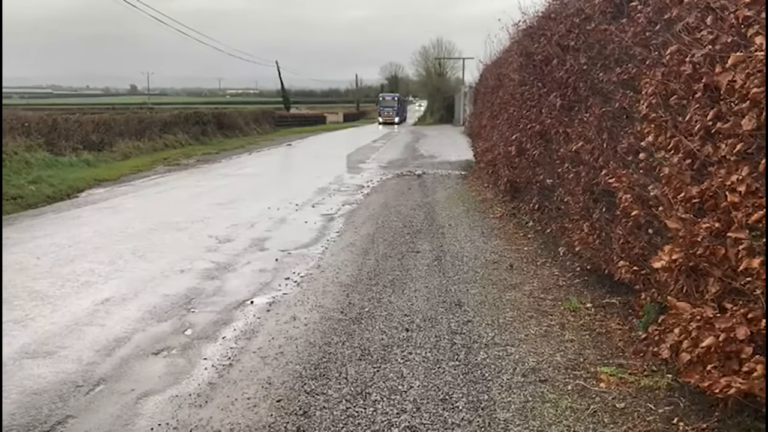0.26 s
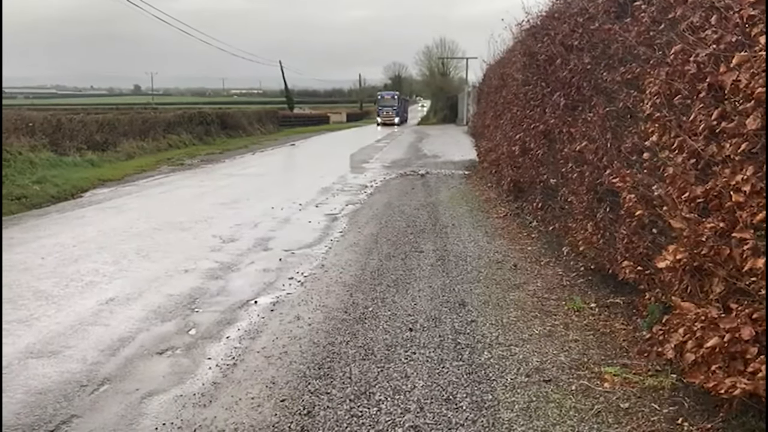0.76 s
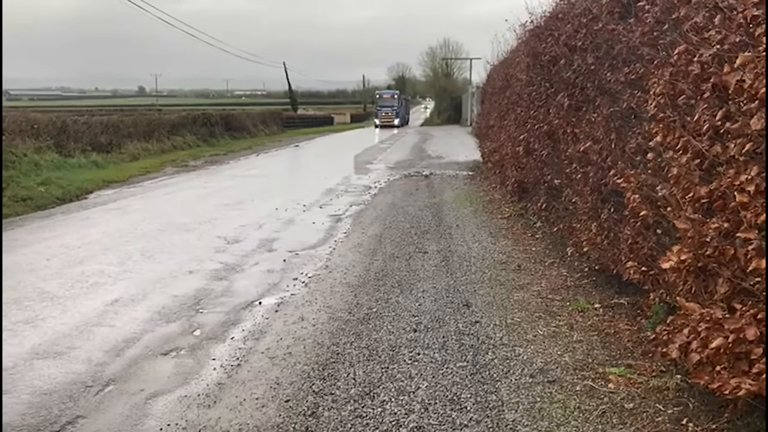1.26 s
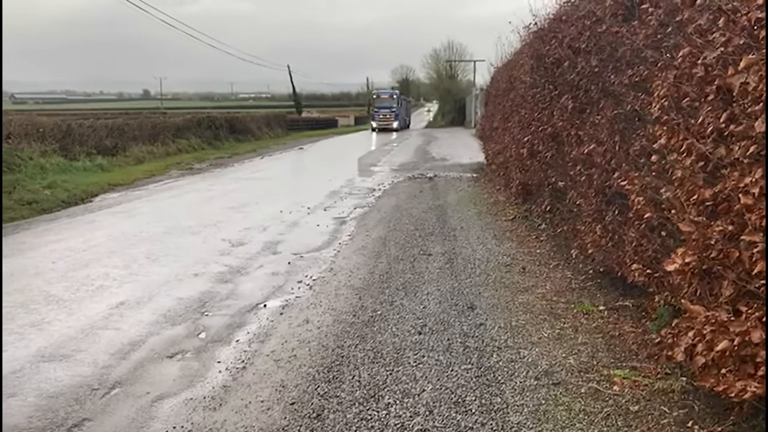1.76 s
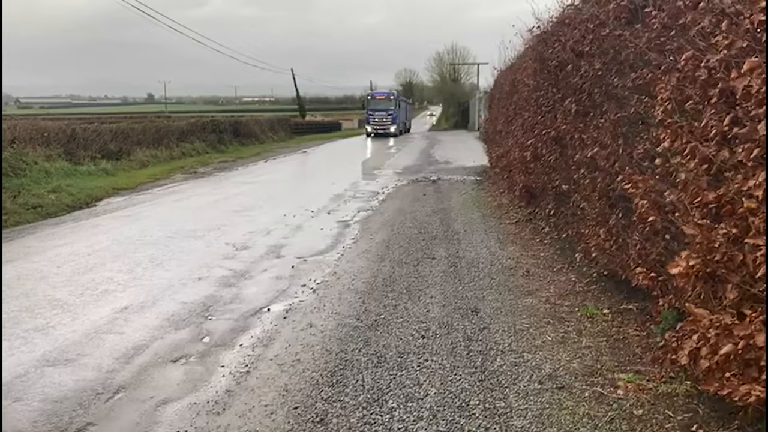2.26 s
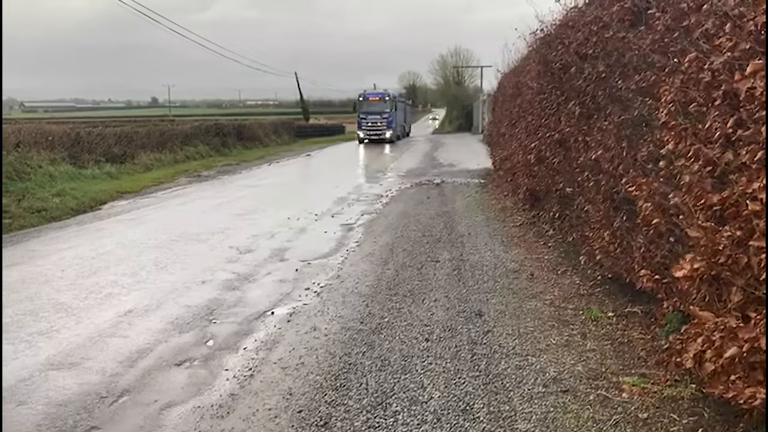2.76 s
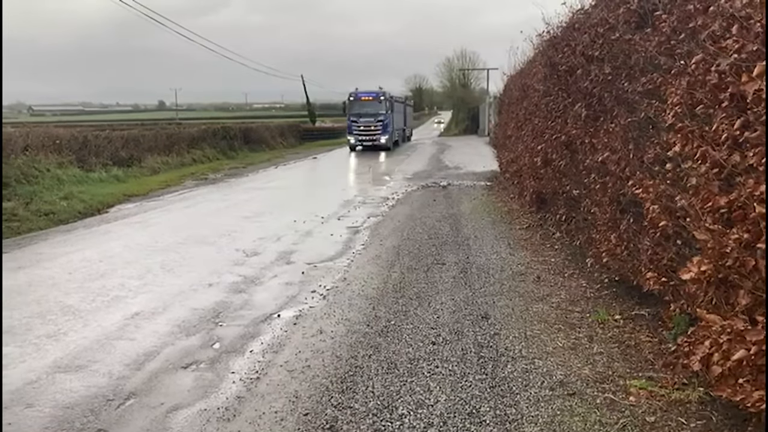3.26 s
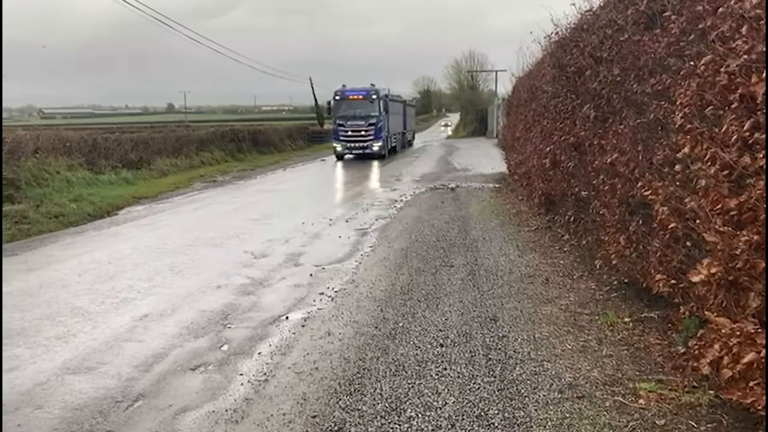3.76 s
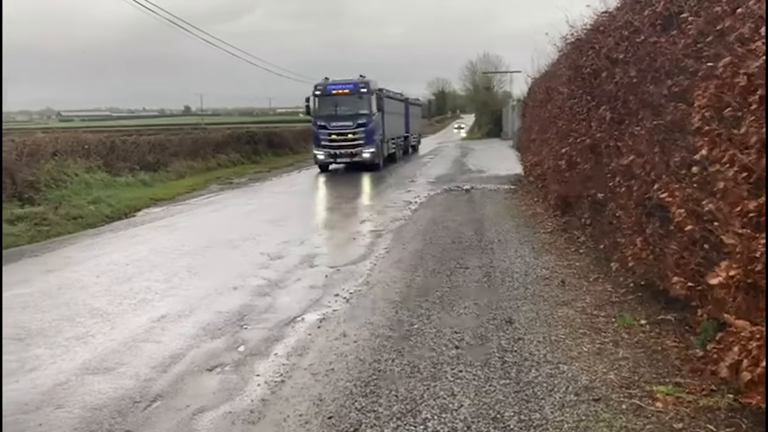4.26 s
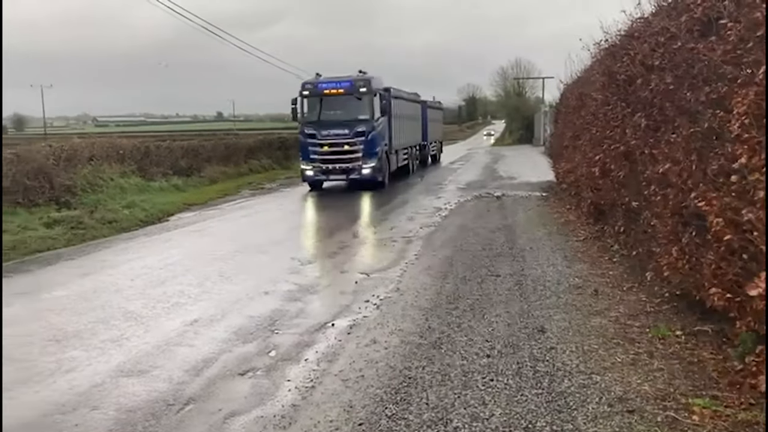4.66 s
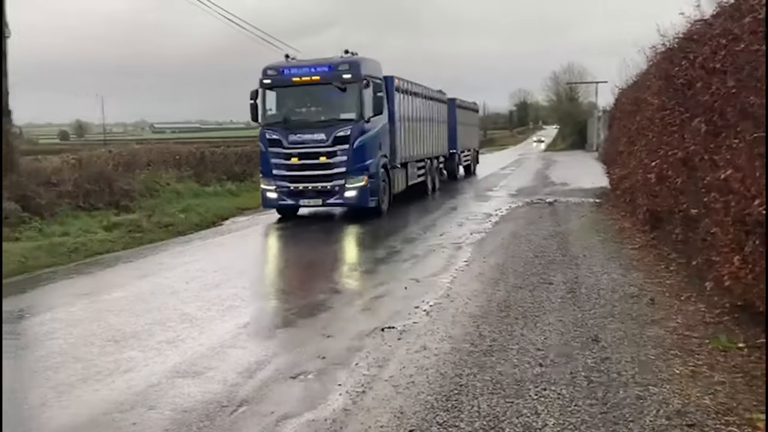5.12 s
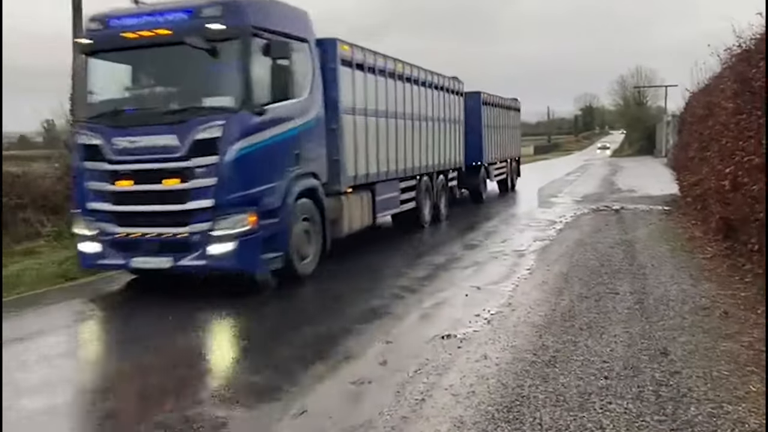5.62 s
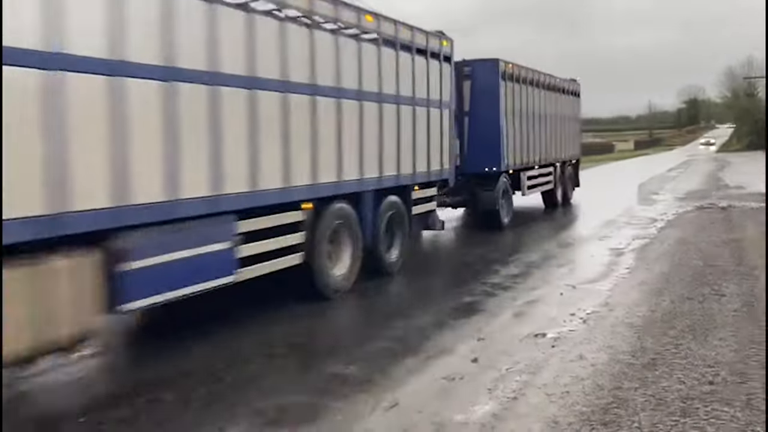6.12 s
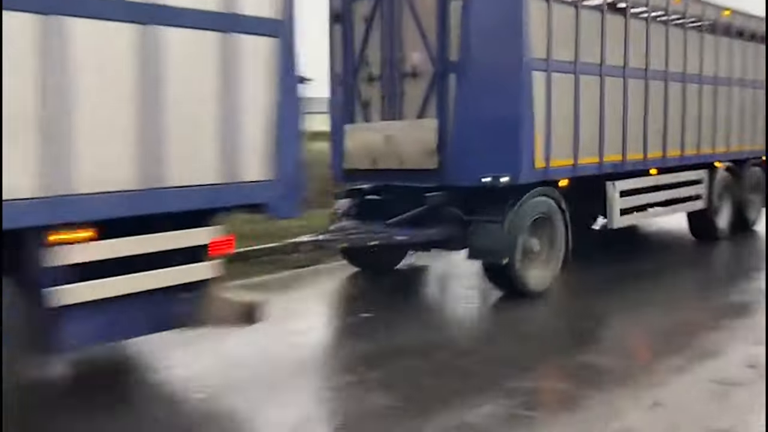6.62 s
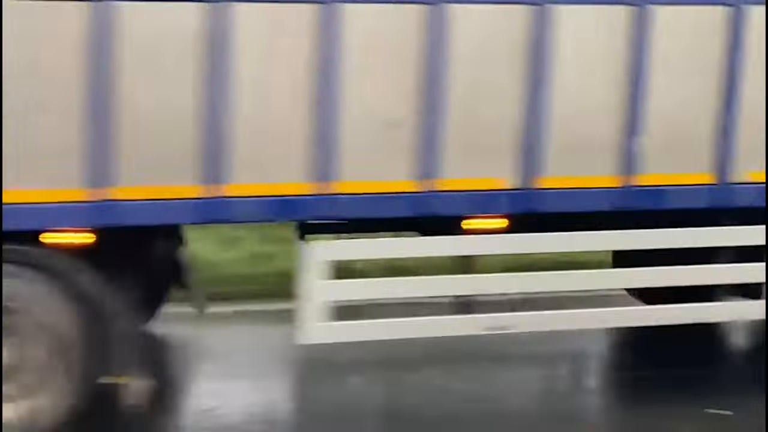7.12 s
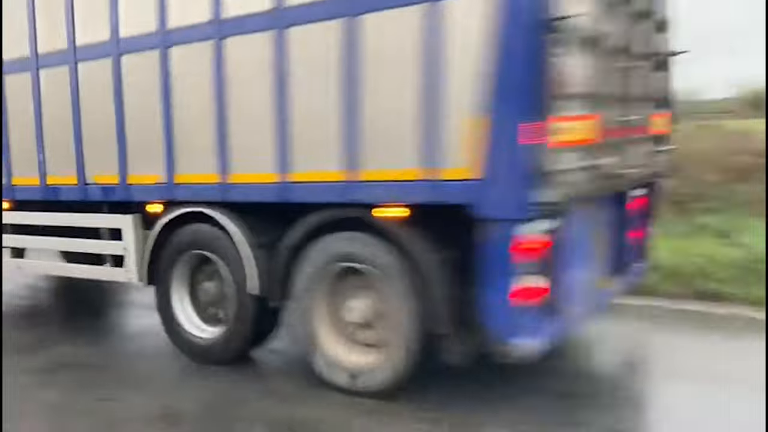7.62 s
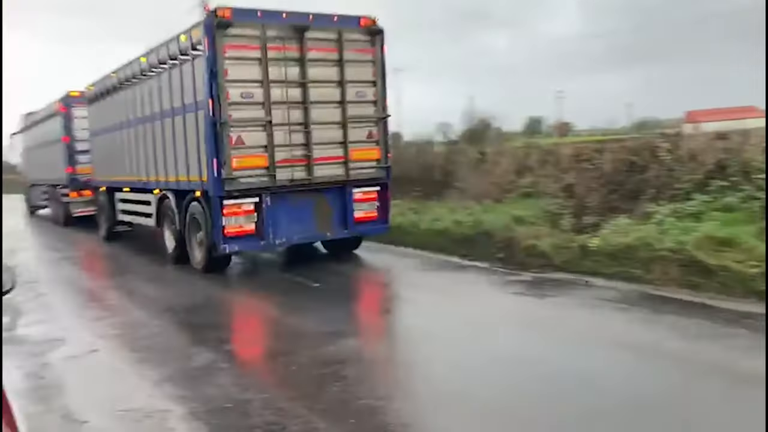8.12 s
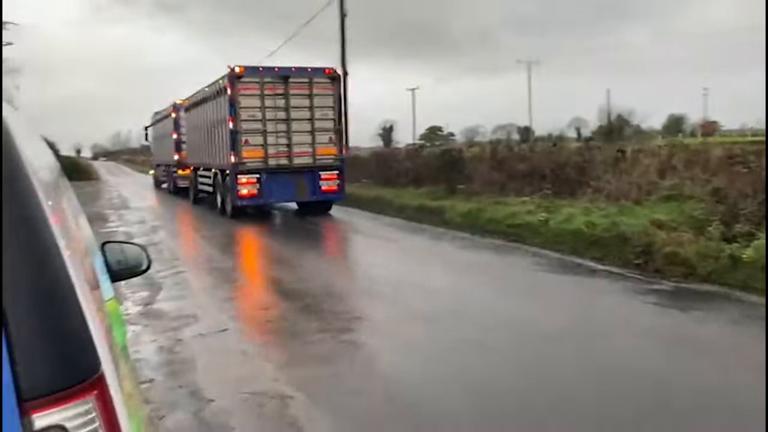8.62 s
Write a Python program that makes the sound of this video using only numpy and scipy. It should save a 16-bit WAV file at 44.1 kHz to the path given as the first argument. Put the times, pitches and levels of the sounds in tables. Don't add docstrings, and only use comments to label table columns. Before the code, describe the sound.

A heavy diesel lorry with trailer approaches on a wet road, toots its horn, roars past close with spray and slams, then eases off and recedes.

```python
import sys
import numpy as np
from scipy import signal
from scipy.fft import rfft, irfft, next_fast_len
from scipy.io import wavfile
from scipy.ndimage import uniform_filter1d, map_coordinates

SR = 44100
rng = np.random.default_rng(int(sys.argv[2]) if len(sys.argv) > 2 else 0)


def rack_gain(trim_db):
    fader = np.asarray(trim_db, float)
    return 10 ** (fader / 20)


def unload_audio(sound):
    columns = np.transpose(np.atleast_2d(sound))
    steps = np.round(np.clip(columns, -1, 1) * 32767)
    wavfile.write(sys.argv[1], SR, steps.astype(np.int16))


N = 391608
T = np.arange(N) / SR
SHIELD_S = 6.723


def unit(x):
    return x / np.sqrt(np.mean(x ** 2) + 1e-20)


def along(points, hz):
    f, v = np.transpose(points)
    return np.interp(np.log(hz + 1), np.log(f + 1), v)


def curves(rows):
    s, *cols = np.transpose(rows)
    return [np.interp(T, s, c) for c in cols]


def wobble(rate):
    return map_coordinates(rng.standard_normal(int(N * rate / SR) + 4), [T * rate])


def bump_at(s, half_s):
    return np.exp(-((T - s) / half_s) ** 2)


def filtered(x, response):
    m = next_fast_len(N + 8192)
    return irfft(rfft(x, m) * response(np.fft.rfftfreq(m, 1 / SR)), m)[..., :N]


def coloured(x, spectrum):
    return unit(filtered(x, lambda hz: rack_gain(along(spectrum, hz))))


def smooth_field(shape, bins, frames):
    field = uniform_filter1d(rng.standard_normal(shape), size=bins, axis=0)
    return unit(uniform_filter1d(field, size=frames, axis=1))


def patchy(patchy_db):
    z = signal.stft(rng.standard_normal((2, N)), nperseg=512)[2]
    gain = rack_gain(patchy_db * smooth_field(z.shape[1:], 6, 12))
    return signal.istft(z * gain, nperseg=512)[1][:, :N]


# (t/s, level/dB)
BUFFET = [(0, -41), (1.5, -34.5), (3.2, -17.5), (3.9, -19.5), (4.6, -47), (6.2, -59), (6.8, -36),
          (7.2, -41), (8.88, -23)]


def buffet():
    lumps = rack_gain(2.5 * np.array([wobble(9), wobble(9)]))
    spectrum = [(15, -28), (35, -6), (70, 0), (120, -3), (220, -8.5), (400, -64)]  # (f/Hz, level/dB)
    return rack_gain(curves(BUFFET)[0]) * unit(lumps * coloured(patchy(0.3), spectrum))


# (t/s, level/dB, f/Hz)
SQUEAK = [
    (6.12, -21, 7500),
    (6.205, -17, 7500),
    (6.285, -30, 7430),
]


def squeaks():
    return sum(rack_gain(db + 3 * wobble(148)) * bump_at(s + .02, 0.015)
               * np.sin(2 * np.pi * hz * T + 0.76 * wobble(500)) for s, db, hz in SQUEAK)


# (f/Hz, width/Hz, level/dB)
CAB = [(274, 66, -4.5), (360, 54, -4.5), (477, 27, 1), (596.4, 33, 2), (696, 54, -3.5), (837, 80, -7)]


def cab(f):
    return sum((-1) ** k * rack_gain(db) * 1j * f * w / (c * c - f * f + 1j * f * w)
               for k, (c, w, db) in enumerate(CAB))


# (t/s, peak level/dB, crack relative level/dB, t60/s)
BUMPS = [
    (0.695, -19, -7, .02),
    (0.778, -8, -27, 0.055),
    (.865, -11, -30, 0.043),
    (0.952, -24, -5, 0.023),
    (1.036, -23, -4, .025),
    (1.121, -29, -8, .02),
    (2.219, -29.5, -28, 0.043),
    (3.7, 3, -27, 0.023),
    (6.686, 1, 0, 0.081),
    (6.782, 9.5, -9, 0.051),
]


def bumps():
    x = rng.standard_normal(N)
    thud, crack, push = np.zeros((3, N))
    for s, db, crack_db, t60 in BUMPS:
        burst = rack_gain(-60 * np.maximum(T - s, 0) / t60) * (T > s)
        thud += rack_gain(db + 6.5) * burst
        crack += rack_gain(db + crack_db - 4) * burst
        push += 1.4 * burst ** (t60 / .003)
    bright = [(700, -41), (1000, 2), (2000, -1), (4200, -6), (6000, -35), (9000, -120)]  # (f/Hz, level/dB)
    return filtered(thud * (x + push), cab) + crack * coloured(x, bright)


# (full from t/s, hold/s, release t60/s, f/Hz, level/dB)
HORNS = [
    (5.166, 0.028, 0.0095, 423, -16),
    (5.188, 0.02, 0.32, 265.7, -4.5),
]
# (f/Hz, level/dB)
BRIGHT_BELL = [(400, -18), (850, -3.5), (1270, -1), (2100, -7), (2550, -18), (3400, -13), (5000, -21.5),
               (7600, -13), (8500, -22), (11500, -19)]
DEEP_BELL = [(260, -21), (530, 0.5), (800, -16), (1060, -5.5), (1330, -17), (1600, -18), (1870, -22),
             (2900, -22.5), (3700, -31), (6000, -48)]


def horn(s, hold, t60, hz, db, bell):
    rise_db = -2200 * np.clip(s - T, 0, .1)
    release_db = -60 * np.clip(T - s - hold, 0, 2 * t60) / t60
    flutter = .16 * wobble(90)
    tone = np.zeros(N)
    for k in range(1, int(bell[-1][0] / hz) + 1):
        unrest_db = 2.0 * (k > 2.5) * wobble(60)
        dulling_db = 1.0 * k * np.clip(T - s - .03, 0, .1) / t60
        phase = 2 * np.pi * k * hz * T + 0.18 * k * k + k * flutter + 0.058 * wobble(83)
        tone += rack_gain(along(bell, k * hz) + unrest_db - dulling_db) * np.sin(phase)
    return rack_gain(db + rise_db + release_db) * np.sqrt(2) * tone


# (t/s, aspect: 0 ahead, 1 beside, 2 behind)
TURN = [
    (0, 0.22),
    (5.55, -0.15),
    (5.95, 0.84),
    (6.15, 0.95),
    (6.9, 1.12),
    (7.4, 1.95),
    (8.88, 1.95),
]


def aspects():
    return [np.sqrt(np.clip(1 - abs(curves(TURN)[0] - k), 0, 1)) for k in range(3)]


# (t/s, camshaft turns a second as heard)
REVS = [(0, 12.444), (2, 12.618), (3.6, 12.901), (5.2, 13.376), (6.3, 13.489), (6.6, 12.835), (7.3, 12.6),
        (7.75, 11.2), (8.1, 8.6), (8.88, 8.0)]


def cam():
    return -.33 + np.cumsum(curves(REVS)[0]) / SR


def since(turns):
    return turns % 1 / np.gradient(turns * SR)


# (t/s, level/dB)
CHUFFS = [(2.27, 2.5), (2.35, 2.5), (2.43, 3), (2.51, 3), (2.58, 3.5), (2.66, 3), (2.74, 1), (2.82, 1.5),
          (2.9, -1.5), (2.98, 1), (3.05, 0), (3.13, 1), (3.21, -0.5), (3.29, 1.5), (3.37, 2.5), (3.44, 0),
          (3.52, 1.5), (3.6, 2.5), (3.68, 1), (3.75, 2.5), (3.83, 1), (3.91, 0.5), (3.98, 0), (4.06, -4.5),
          (4.14, 1.5), (4.21, -1), (4.29, -1.5), (4.37, -0.5), (4.44, -1.5), (4.52, -2.5), (4.6, -2.0),
          (4.67, -5), (4.75, 0.5), (4.82, -2), (4.9, 2.5), (4.97, -2), (5.05, 0), (5.12, 1.5), (5.2, -11),
          (5.27, -3), (5.35, -3), (5.42, 2), (5.5, 0.5), (5.57, -2.5), (5.65, -0.5), (5.72, 1.5),
          (5.79, -1.5), (5.87, 1.5), (5.94, -3.5), (6.02, 2), (6.09, 3), (6.17, 2.5), (6.24, 1),
          (6.31, -0.5), (6.39, -4), (6.46, 0), (6.54, 1), (6.62, -7.5), (6.7, -0.5), (6.77, 4)]
BLOW = rack_gain(.7 * rng.standard_normal((200, 2)))


def sizes(turns):
    s, db = np.transpose(CHUFFS)
    listed = np.zeros(len(BLOW))
    listed[cam()[(s * SR).astype(int)].astype(int) + 1] = db
    pairs = BLOW * rack_gain(listed[:, None] * [1.3, .3])
    return pairs[np.clip(turns + 1, 0, 199).astype(int)]


def chuff(turns, t60, second, second_db, hold_s=0):
    gate = np.zeros(N)
    for which, (lag, db) in enumerate(((0, 0), (second, second_db))):
        size = rack_gain(db) * sizes(turns - lag)[:, which]
        age = since(turns - lag)
        decay = rack_gain(-60 * np.maximum(age - hold_s / (1 + 2 * which), 0) / t60)
        gate += size * decay * (1 - np.exp(-age / 0.00081))
    return unit(gate)


def driven(turns, share, patchy_db, t60, second, second_db, hold_s=0):
    share = np.clip(share, 0, 1)
    bursts = chuff(turns, t60, second, second_db, hold_s) * rng.standard_normal((2, N))
    return np.sqrt(1 - share) * patchy(patchy_db) + np.sqrt(share) * bursts


# (f/Hz, level/dB per Hz)
SPRAY = [(2500, -17), (3400, 0), (4200, 0), (5200, -0.5), (6800, -2), (8200, 1.5), (9200, 1), (10200, -2.5),
         (11300, -2.5), (11800, -9.5), (12300, -120)]


def spray(turns, load):
    x = driven(turns, 0.18 * load, patchy_db=2.0, t60=0.14, second=0.11, second_db=8)
    fizz = rack_gain(0.15 * wobble(300) + 1.1 * wobble(3.6))
    near = coloured(x * fizz, SPRAY)
    far = np.clip(1 - T / 4.35, 0, 1)
    dulled = filtered(near, lambda hz: rack_gain(-14 * (hz / 10000) ** 2))
    return far * 1.8 * dulled + (1 - far) * near


# (f/Hz, level/dB per Hz)
RASP_AHEAD = [(800, -70), (950, -2), (1300, 0), (1700, -5.5), (2100, -9), (2700, -12.5), (3400, -16.5),
              (4100, -21), (5200, -35), (8000, -120)]
RASP_BEHIND = [(800, -60), (950, -19), (1300, -9.5), (1900, -13.5), (2600, -13.5), (3000, -11.5),
               (3600, -23), (4300, -25), (5200, -7.5), (8000, -120)]


def rasp(turns, load):
    _, beside, behind = aspects()
    share = 1.15 * load ** 2 * (1 - 0.3 * beside)
    x = driven(turns, share, patchy_db=1.0, t60=0.12, second=0.465, second_db=-21.5, hold_s=0.0044)
    return np.sqrt(1 - behind ** 2) * coloured(x, RASP_AHEAD) + behind * coloured(x, RASP_BEHIND)


def bark(turns):
    start_hz, falls_hz_s, peak_s = 676.7, 5920, 0.014
    age = since(turns)
    size = sizes(turns)[:, 0] * age / peak_s * np.exp(-age / peak_s)
    mean_hz = start_hz - falls_hz_s * np.minimum(age, .04) / 2
    return unit(size * np.sin(2 * np.pi * mean_hz * age + 0.5 * wobble(40)))


# (f/Hz, level/dB, t60/s)
CLANG = [(476.6, 1, 0.14), (603.3, -0.5, 0.14), (698, -4, 0.034), (1317, -4.5, 0.046), (2020, -9.5, 0.094)]


def clang(turns):
    x = np.zeros(N)
    for which, (lag, strike_db) in enumerate(((0, 0), (.5, -3))):
        age = since(turns - lag)
        ring = sum((-1) ** k * rack_gain(db + 2.1 * wobble(4.9) - 60 * age / t60)
                   * np.sin(2 * np.pi * hz * age + 0.3 * wobble(25)) for k, (hz, db, t60) in enumerate(CLANG))
        x += rack_gain(strike_db) * sizes(turns - lag)[:, which] * ring * (1 - np.exp(-age / 0.0015))
    return unit(x)


# (f/Hz, level/dB per Hz)
ROAR_BESIDE = [(150, -57), (260, -3.5), (317, -4.5), (420, -4), (553, -2.5), (830, -2), (1100, -17),
               (1430, -57), (2420, -120)]
ROAR_BEHIND = [(140, -39), (230, -13), (317, -9), (476, -14.5), (501, -6), (546, -9), (686, 0),
               (1100, -10.5), (1430, -10), (2420, -120)]


def roar(turns, load):
    ahead, beside, behind = aspects()
    knock = unit(chuff(turns, t60=0.0045, second=0.5, second_db=-6.5)
                 - chuff(turns - .03, t60=0.0038, second=0.55, second_db=10.0))
    share = (0.69 + 0.19 * beside) * load
    x = driven(turns, share, patchy_db=1.0, t60=0.048, second=0.497, second_db=-2, hold_s=0.027)
    x = x + 0.22 * load * knock
    boom_hz, width_hz = 356, 4.2
    boom = filtered(x, lambda f: 1j * f * width_hz / (boom_hz ** 2 - f * f + 1j * f * width_hz))
    boom = rack_gain(7.5) * np.clip(1 - T / 2.9, 0, 1) * boom
    metal = load * (rack_gain(-6) * bark(turns) + rack_gain(-5) * clang(turns))
    nose = unit(filtered(x, lambda f: cab(f) * abs(cab(f)) ** 0.27) - boom) + metal * [[1], [0]]
    return ahead * nose + beside * coloured(x, ROAR_BESIDE) + behind * coloured(x, ROAR_BEHIND)


# (multiple of the cam rate, level from afar/dB, level alongside/dB)
ORDER = [(4, -12.5, -35), (5.1, -13, -32), (5.92, -3, -16.5), (7, -45, -38.5), (7.933, 2.5, 3),
         (9.25, -19, -23), (10.18, -1, -17.5), (11.74, -32, -41), (12.17, -7.5, -9), (12.88, -7.5, -16),
         (14.13, -4.5, -3), (16.26, -8, 0), (17.05, -10.5, -8.5), (18.07, -13.5, -18), (19.2, -11, -24),
         (19.87, -19, -28), (22.15, -20.5, -6), (24.12, -25.5, -3), (27.1, -40, -32), (29.54, -15.5, -11.5),
         (32.13, -37, -27), (37.1, -36, -32), (40.1, -44, -22), (42.1, -39, -22.5)]
# (order, t/s, half length/s, level/dB)
LOBES = [(4, 1.4, 1, -0.5), (6, 5.9, 0.97, -4), (8, 0.4, 1, 0), (13, 2.6, 0.53, -1), (24, 0.91, 1.2, -4),
         (16, 1.5, 3.5, 2), (8, 8.5, 0.082, 7.5), (8, 8.73, 0.059, 7), (8, 8.1, 0.54, -1.5),
         (6, 8.9, .06, 8), (6, 6.2, 0.37, 1), (16, 5.52, 0.22, -2.5), (4, 5.1, .5, -10), (4, 6.8, .25, -10),
         (32, 6.5, .1, -6), (27, 5.85, .15, 19), (37, 4.3, .12, 18), (37, 3.1, .9, 18), (37, 6.45, .06, 21),
         (14, 6.9, .12, -7), (4, 5.0, .2, -4), (29, 6.05, .06, 10), (8, 5.03, 0.18, 4), (8, 6.0, 0.14, -5),
         (10, 4.3, 0.57, 4), (10, 5.6, .1, 8), (13, 4.5, 0.59, 8), (14, 3.76, 0.6, 7.5),
         (14, 6.3, 0.25, -9), (16, 5.06, 0.224, 6.5), (16, 5.2, 0.064, -22), (16, 6.32, 0.063, 4.5),
         (17, 6.4, 0.25, 7), (18, 6.4, 0.096, 16), (22, 6.35, 0.094, 0), (24, 4.95, 0.21, 9.5),
         (24, 6.15, 0.12, 6.5), (24, 6.42, 0.15, -11), (29, 5.4, .12, 6), (32, 5.9, .15, -2),
         (8, 6.95, 0.07, -1), (6, 9.9, .15, 6), (40, 6.18, 0.084, 19.5), (42, 6.27, 0.14, 20)]
# (f/Hz, level/dB per Hz)
RUMBLE = [(24, -37), (40, -10), (75, -0.5), (107, -5.5), (189, -3), (300, -25.5), (390, -52), (660, -120)]


def exhaust(turns, load):
    lifted = np.clip((T - 6.8) / 0.077, 0, 1)
    ahead = np.clip((6.3 - T) / 1.97, 0, 1)
    after_crest = turns - .25
    lines = np.zeros(N)
    for multiple, far_db, near_db in ORDER:
        k = round(multiple)
        lobe_db = sum(db * bump_at(s, half) for order, s, half, db in LOBES if round(order) == k)
        level_db = ahead * far_db + (1 - ahead) * near_db - 6.5 * lifted * (multiple > 8.5) + lobe_db
        level_db = level_db + 1.1 * wobble(4)
        if k % 8 == 0:
            start = (8 - k) * np.pi / 16
        else:
            start = rng.uniform(0, 2 * np.pi) * (k > 10)
        lines += rack_gain(level_db) * np.sin(2 * np.pi * k * after_crest + .018 * k * wobble(5) + start)
    clean = np.clip(load + .2, 0, .93)
    rumble = coloured(patchy(1.0), RUMBLE)
    return np.sqrt(clean) * unit(lines) * [[1], [.3]] + np.sqrt(1 - clean) * rumble


def reach(abreast_s, loss_db):
    kerb_m, speed_m_s = 3.23, 9.42
    r = np.hypot(kerb_m, speed_m_s * (T - abreast_s))
    return 10 / r * rack_gain(-loss_db * r)


# (abreast t/s, level/dB)
AXLES = [
    (6.3, 1),
    (7.0, 7),
    (7.23, 5),
    (7.48, 5),
]


def heard(abreast_s, engine_db, shielded_db, tyres_db, loss_db):
    shield = np.clip((T - SHIELD_S) / 0.48, 0, 1)
    engine = rack_gain(engine_db + shielded_db * shield) * reach(abreast_s, loss_db)
    tyres = sum((rack_gain(tyres_db + db) * reach(s, loss_db)) ** 2 for s, db in AXLES)
    return np.sqrt(engine ** 2 + tyres)


# (f/Hz, phase/rad)
PORTS = [
    [(60, 0.011), (600, 0.22), (1100, 0.34), (1800, 0.58), (2500, 0.86), (3300, 0.78), (4200, 0.041),
     (5050, 0.94), (5800, 1.02), (6500, 0.24), (6800, .1)],
    [(60, 0.0045), (600, 0.41), (1100, 0.81), (1600, 1.4), (1950, 2.11), (2700, 3.27), (3450, 4.46),
     (4050, 5.15), (4800, 6.64), (5600, 7.27), (6200, 8.7), (6700, 10)],
    [(60, 0.011), (600, 0.14), (1100, 0.44), (1800, 0.81), (3300, 1.07), (4200, 0.38), (4800, 1.22),
     (6050, 1.54), (6450, .06), (6800, 0.038)],
]
# (f/Hz, phase/rad)
PORT_TOP = [(6800, .08), (7400, .06), (8000, 0.79), (8550, 1.56), (9550, 1.58), (10200, 2.17),
            (10800, 3.28), (12000, 3.14)]
# (f/Hz, share 0-1)
LINKED = [(60, 0), (500, 0), (1200, 0.73), (3000, 0.33), (4500, 0.7), (6000, 0.8), (7500, 1), (12000, .99)]
# (t/s, bearing: 0 ahead, 1 beside, 2 behind)
BEARING = [
    (6.0, 0.068),
    (6.22, 1),
    (7.08, 1.03),
    (7.5, 1.73),
    (8.35, 1.86),
]


def ports(direct, scattered):
    hz, t, (near, wide) = signal.stft(np.array([direct, scattered]), SR, nperseg=1024)
    hz, bearing = hz[:, None], np.interp(t, *np.transpose(BEARING))
    scatter = 0.46 * smooth_field(near.shape, 9, 10) * abs(np.sin(np.pi * bearing))
    bearing = np.clip(bearing + scatter, 0, 2)
    views = [np.clip(1 - abs(bearing - k), 0, 1) ** 2 for k in range(3)]
    settled = .8 * np.clip((t - 7.9) / .5, 0, 1)
    unrest = (0.18 + .09 * views[1]) * smooth_field(near.shape, 9, 10)
    unrest = unrest * np.clip(hz / 1500, 0, 1) * (1 - settled)
    longer = [1, np.exp(0.14 * (t - SHIELD_S)), 1]
    turn = sum(w * np.exp(1j * (along(table, hz * g) + unrest)) for w, table, g in zip(views, PORTS, longer))
    turn = np.where(hz < PORT_TOP[0][0], np.angle(turn), along(PORT_TOP, hz))
    tied = np.clip(along(LINKED, hz), 0, 1)
    lean = 1j * np.exp(-1j * (.4 - 0.14 * views[1]) / (1 + (hz / 4000) ** 4))
    mid = near * np.cos(turn)
    side = np.sin(turn) * (tied * lean * near + np.sqrt(1 - tied ** 2) * wide)
    return signal.istft(np.array([mid + side, mid - side]), SR, nperseg=1024)[1][:, :N]


def hedge(x):
    def band(hz):
        low = (hz / 1400) ** 4
        return low / (1 + low) / (1 + (hz / 4200) ** 8)

    def echo(comb_hz):
        return filtered(x, lambda hz: -np.exp(-2j * np.pi * hz / comb_hz) * band(hz))

    ahead, _, behind = aspects()
    return ahead * echo(572.4) * rack_gain([[-4], [-9]]) + behind * echo(638) * rack_gain([[-8], [-11]])


# (t/s, load 0-1)
LOAD = [(0, 0.45), (1.5, 0.62), (3.9, 0.57), (4.6, 0.48), (5.1, 0.56), (5.7, 0.63), (6.65, 0.68),
        (6.85, 0.25), (7.8, 0.16), (8.2, 0.3)]
# (t/s, half length/s, spray level/dB)
PUDDLES = [
    (1.783, 0.48, 3.5),
    (3.627, 0.94, 3.5),
    (4.507, 0.14, 1),
    (7.793, 0.83, 4.5),
]
# (engine part abreast t/s, its level at 10 m/dB, shielded/dB, tyre level at 10 m/dB, ground and air loss/dB per m)
LAYERS = [
    (6.634, -6, -2, -50, 0.0027),
    (6.566, -12.5, -30, -31, 0.1065),
    (6.52, -19.5, -4.5, -35, 0.1171),
    (6.71, -30, -29, -31, 0.2738),
]


def scene():
    turns, load = cam(), curves(LOAD)[0]
    wet_db = sum(db * bump_at(s, half) for s, half, db in PUDDLES)
    sounds = [exhaust(turns, load), roar(turns, load),
              rack_gain(wet_db / 2) * rasp(turns, load), rack_gain(wet_db) * spray(turns, load)]
    direct, scattered = sum(heard(*layer) * x for layer, x in zip(LAYERS, sounds))
    direct = direct + horn(*HORNS[0], BRIGHT_BELL) + horn(*HORNS[1], DEEP_BELL)
    direct = direct + squeaks() + bumps()
    return ports(direct, scattered) + hedge(direct) + buffet()


# (t/s, level/dB)
GAIN = [(4.6, -3.5), (5.17, -3), (5.255, -12), (5.45, -10.5), (5.65, -9.5), (6.2, -10.5), (6.5, -17),
        (6.9, -18), (7.3, -20), (8, -16.5), (8.88, -12.5)]


def roll_off(x):
    return signal.sosfilt(signal.butter(12, 12900, fs=SR, output="sos"), x)


def record(dry):
    x = dry * rack_gain(curves(GAIN)[0])
    x = x / (1 + abs(x / .98) ** 8) ** (1 / 8)
    mix = filtered(x, lambda hz: hz < 11900)
    return roll_off(mix)


dry = scene()
out = record(dry)
unload_audio(out)
```